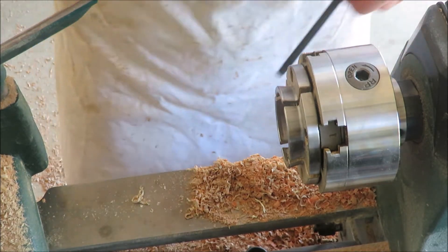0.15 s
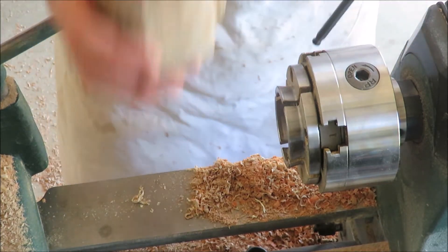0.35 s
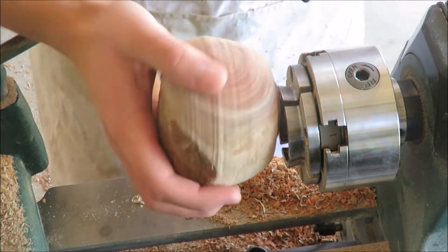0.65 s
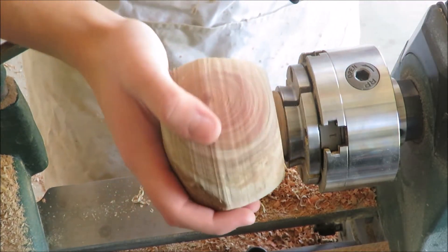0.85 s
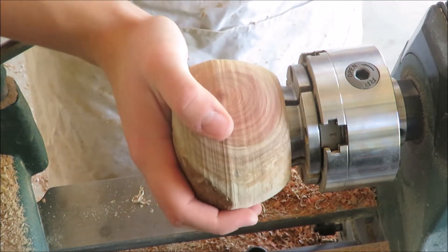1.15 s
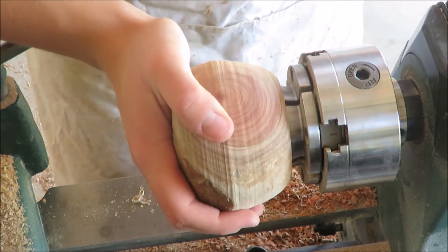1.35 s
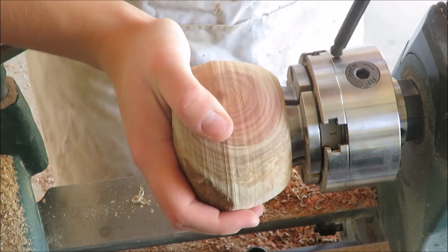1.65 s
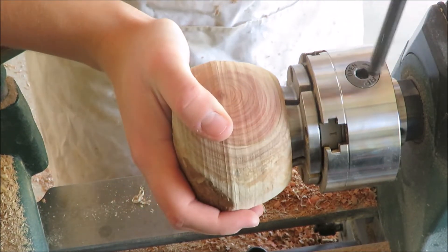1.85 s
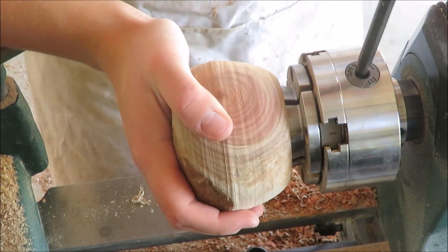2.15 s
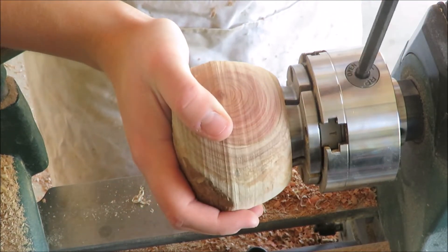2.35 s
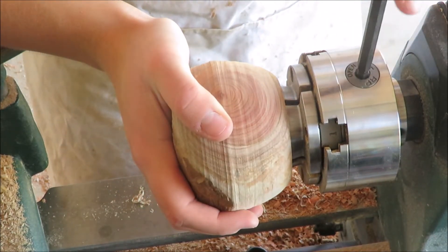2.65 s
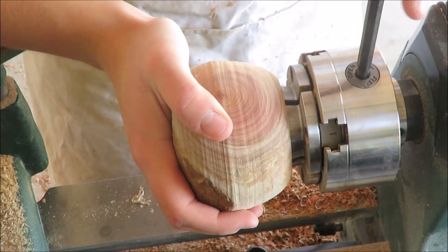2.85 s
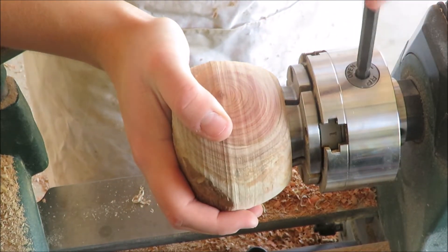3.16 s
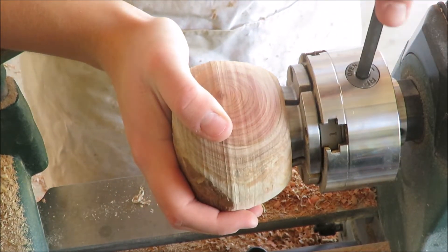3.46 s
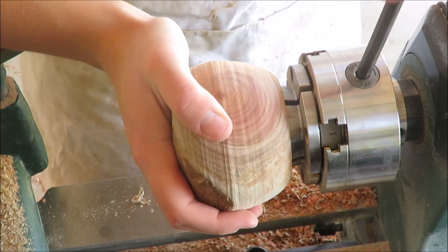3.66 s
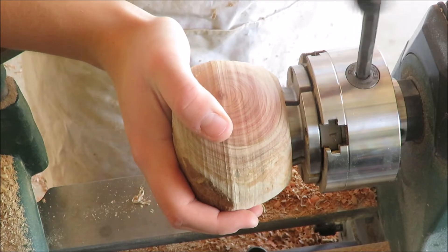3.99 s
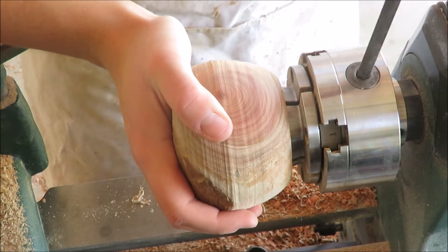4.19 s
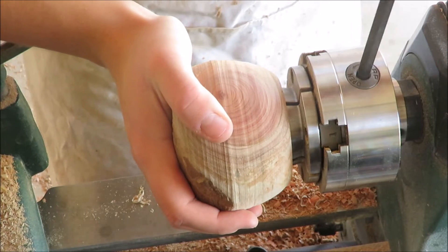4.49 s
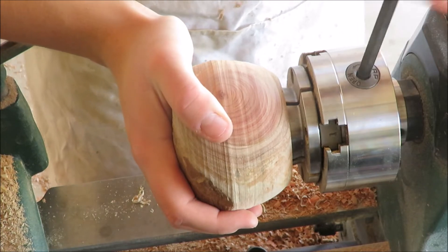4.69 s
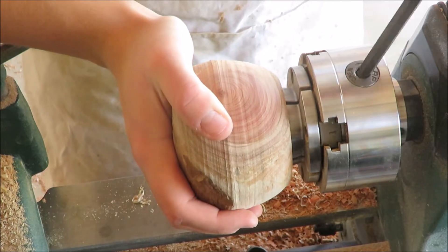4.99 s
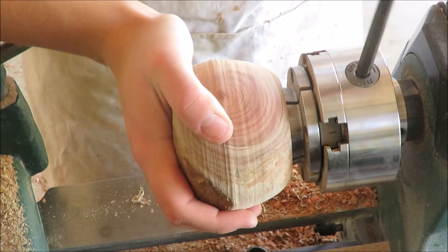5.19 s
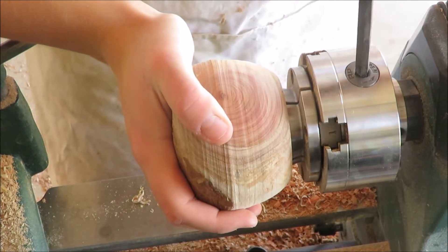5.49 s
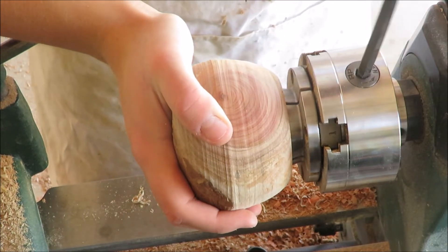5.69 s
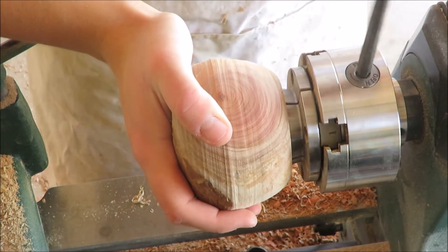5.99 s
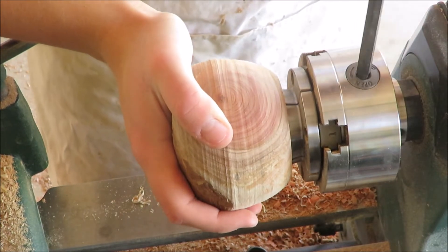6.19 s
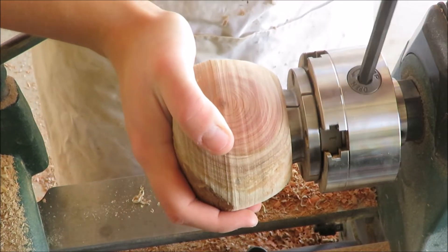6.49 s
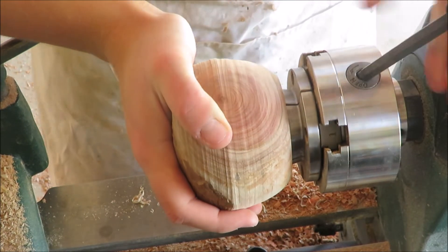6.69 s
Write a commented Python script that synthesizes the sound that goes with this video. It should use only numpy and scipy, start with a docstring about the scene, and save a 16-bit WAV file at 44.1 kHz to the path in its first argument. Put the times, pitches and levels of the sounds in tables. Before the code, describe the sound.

Close stereo microphone in a moderately live workshop. Cloth swishes, then a wooden blank thumps and rattles against loose metal jaws. A steel key knocks loudly on the chuck, taps around for its socket and drops in with a very sharp clack. Faint gritty rasps and small ticks follow as it is wound, while outside a motor vehicle slowly approaches, revving and changing gear.

```python
"""Closing a lathe chuck

A wooden blank bumps into the jaws of a lathe chuck: filtered noise bursts plus wood modes, and the jaws buzz.
A steel key knocks on the chuck, finds its socket and drops home: noise chatter, decaying modes, room echo.
Winding the jaws shut makes a faint rasp of random grains and hiss, with gritty scrapes.
Apart from these, narrow-band noise gives a dull rub, faint whines, a low swell and a squeak.
Cloth noise swishes; outside, a motor vehicle draws nearer: exhaust harmonics and road noise over room air and hum."""
import sys
import numpy as np
from scipy import signal
from scipy.fft import rfft, irfft
from scipy.io import wavfile
from scipy.ndimage import uniform_filter1d

SR = 44100
rng = np.random.default_rng(int(sys.argv[2]) if len(sys.argv) > 2 else 0)


def persist_wave(psi):
    """Save psi, clipped to +-1, as 16-bit WAV."""
    counts = np.round(np.clip(psi, -1, 1) * 32767).astype(np.int16)
    wavfile.write(sys.argv[1], SR, np.atleast_2d(counts).T)


N = 301644  # samples


def amp(db):
    """Decibels to gain."""
    return 10 ** (np.asarray(db) / 20)


def unit(x):
    """Scale to rms 1."""
    return x / np.sqrt(np.mean(x ** 2) + 1e-20)


def read(points, hz):
    """Interpolate a spectrum table on a log-frequency axis."""
    f, value = np.transpose(points)
    return np.interp(np.log(hz + 1), np.log(f + 1), value)


def follow(rows, t):
    """Interpolate the columns of a time table at times t."""
    s, *columns = np.transpose(rows)
    return [np.interp(t, s, c) for c in columns]


def add(mix, start_s, sound):
    """Mix a sound in at start_s, cut at the end of the mix."""
    part = mix[:, round(start_s * SR):][:, :sound.shape[-1]]
    part += sound[..., :part.shape[1]]


def colour(x, points_db, size=4096):
    """Minimum-phase filter with the given spectrum: attacks stay sharp."""
    hz = abs(np.fft.fftfreq(size, 1 / SR))
    log_gain = np.log(amp(read(points_db, hz)))
    response = np.exp(np.conj(signal.hilbert(log_gain)))
    taps = np.fft.ifft(response).real[:size // 2]
    return signal.fftconvolve(np.atleast_2d(x), taps[None], axes=1)[:, :x.shape[-1]]


def slow_random(shape, window):
    """Smooth random curve of rms 1: white noise averaged twice over window samples."""
    once = uniform_filter1d(rng.standard_normal(shape), size=window)
    return unit(uniform_filter1d(once, size=window))


# left-right correlation of diffuse sound: f/Hz, correlation
CORRELATION = [(60, 1.0), (200, 0.91), (550, 0.71), (1650, 0.83), (5000, -0.0039), (15000, -0.6)]


def noise(field_db, length, size=512, width=1):
    """Diffuse stereo noise, partly shared by both channels, with level field_db(t/s, f/Hz)."""
    hop = size // 4
    t = np.arange(length // hop + 5)[:, None] * hop / SR
    hz = np.fft.rfftfreq(size, 1 / SR)
    a, b, c, d = rng.standard_normal((4, len(t), len(hz)))
    same = np.clip(1 - width * (1 - read(CORRELATION, hz)), -1, 1)
    left = a + 1j * b
    right = same * left + np.sqrt(1 - same ** 2) * (c + 1j * d)
    z = np.array([left, right]) * amp(field_db(t, hz))
    return signal.istft(z.swapaxes(1, 2), nperseg=size, noverlap=size - hop)[1][:, :length]


def ring(modes, t):
    """Modal ring: exponentially decaying sines of alternating sign."""
    out = np.zeros(len(t))
    for k, (hz, db, t60_s) in enumerate(modes):
        out += (-1) ** k * amp(db - 60 * t / t60_s) * np.sin(2 * np.pi * hz * t)
    return out


# workshop reverberation: f/Hz, T60/s
ROOM_T60_S = [(150, 0.78), (500, 0.44), (1400, 0.37), (3000, 0.42), (6000, 0.31), (14000, 0.26)]


def echo(spectrum_db, t, build_s, width):
    """Room answer to a blow: noise that builds up briefly, then decays at each band's T60."""
    tail = noise(lambda s, hz: read(spectrum_db, hz) - 60 * s / read(ROOM_T60_S, hz), len(t), width=width)
    early_rms = np.sqrt(np.mean(tail[:, :SR // 20] ** 2))
    return tail / early_rms * (1 - np.exp(-(t / build_s) ** 2))


def near(x, lag_samples=0.87):
    """Close source: the left channel lags by a fraction of a sample."""
    turn = np.exp(-2j * np.pi * np.fft.rfftfreq(len(x)) * lag_samples)
    return np.array([irfft(rfft(x) * turn, len(x)), x])


def arches(rows, peak_at, steepness):
    """Summed gain of one swell per row (start/s, length/s, level/dB), peaking at a share of its length."""
    t = np.arange(N) / SR
    skew = np.log(.5) / np.log(np.clip(peak_at, .05, .95))
    gain = np.zeros(N)
    for start, length, db in rows:
        phase = np.clip((t - start) / length, 0, 1) ** skew
        gain += amp(db) * abs(np.sin(np.pi * phase)) ** steepness
    return gain


# room air spectrum: f/Hz, relative level/dB per Hz
AIR = [(15, -44), (25, -26), (48, -8), (206, -10), (317, -11), (677, -16.5), (911, -16.5), (1070, -17.5),
       (1230, -20.5), (1890, -19), (2220, -21), (12900, -41.5), (16000, -54)]


def workshop(air_db=-49, hum_hz=101.2, hum_db=-61):
    """Steady room background: coloured noise plus a faint mains hum."""
    hum = unit(np.sin(2 * np.pi * hum_hz * np.arange(N) / SR))
    air = unit(noise(lambda s, hz: read(AIR, hz), N, size=2048))
    return amp(air_db) * air + amp(hum_db) * hum


# road noise spectrum: f/Hz, relative level/dB per Hz
ROAD = [(15, -52.5), (25, -21.5), (59, -11.5), (112, -16), (133, -10), (159, -15), (213, -9), (301, -12),
        (446, -18.5), (1080, -13.5), (1490, -14.5), (2300, -22.5), (3200, -26.5), (4800, -37),
        (9000, -49.5), (11700, -84), (19800, -120)]
# engine revs up, changes gear, pulls again: t/s, firing rate/Hz, load/dB
ENGINE = [(1.7, 55.2, -6), (2.15, 57.26, 9.5), (3.3, 71.1, -2), (3.75, 73.9, -14), (4.8, 50.62, -3),
          (5.45, 52.1, -0.5), (5.7, 53.83, 5.5), (6.3, 56.57, 3), (6.55, 57, -4.5), (6.84, 57.85, -0.5)]
# exhaust harmonics: multiple of firing rate, relative level/dB
EXHAUST = [(1, -11), (2, 0), (3, -24), (4, -10.5), (5, -13.5), (6, -19.5), (7, -21.5)]
# straight road
SPEED_M_PER_S, ROAD_OFFSET_M, PASSES_AT_S = 8.08, 7, 7.517
# levels before distance loss; roar follows load at a fraction of dB per dB
ROAR_DB, EXHAUST_DB, GROUND_LOSS_DB_PER_M, ROAR_PER_LOAD = -13.5, -14, 0.29, 0.054
# roar slope above the pivot, far off and abreast
FAR_TILT_DB_PER_OCT, NEAR_TILT_DB_PER_OCT = -5, 4
# the exhaust booms when a harmonic meets the pipe resonance
PIPE_HZ, PIPE_WIDTH_HZ, PIPE_DB = 69, 8.4, 12.5


def vehicle(waver=0.005, throb=0.21, pivot_hz=1000):
    """Exhaust tones and tyre roar swell with falling distance; the roar also brightens."""
    def distance_m(s):
        return np.hypot(ROAD_OFFSET_M, SPEED_M_PER_S * (PASSES_AT_S - s))

    def tilt_db_per_oct(s):
        nearness = ROAD_OFFSET_M / distance_m(s)
        return FAR_TILT_DB_PER_OCT + (NEAR_TILT_DB_PER_OCT - FAR_TILT_DB_PER_OCT) * nearness

    def roar_db(s, hz):
        return read(ROAD, hz) + tilt_db_per_oct(s) * np.log2(np.maximum(hz / pivot_hz, 1))

    t = np.arange(N) / SR
    roar = unit(noise(roar_db, N, size=2048))
    firing_hz, load_db = follow(ENGINE, t)
    drift = slow_random((len(EXHAUST) + 1, N), 2500)
    cycles = np.cumsum(firing_hz * (1 + waver * drift[-1])) / SR
    tones = np.zeros(N)
    for (k, line_db), wobble in zip(EXHAUST, drift):
        boom_db = PIPE_DB * np.exp(-((k * firing_hz - PIPE_HZ) / PIPE_WIDTH_HZ) ** 2)
        tone = np.sin(2 * np.pi * (k * cycles + rng.random()))
        tones += amp(line_db + boom_db) * (1 + throb * wobble) * tone
    sound = amp(ROAR_DB + ROAR_PER_LOAD * load_db) * roar + amp(EXHAUST_DB + load_db) * unit(tones)
    return sound * amp(-GROUND_LOSS_DB_PER_M * distance_m(t)) / distance_m(t)


# cloth spectrum: f/Hz, relative level/dB
CLOTH = [(200, -20), (700, -9), (1200, 0), (1900, 1.5), (3000, -3), (5000, -11.5), (9000, -21.5),
         (16000, -32)]
# arm sweeps past the apron: start/s, length/s, level/dB
SWISHES = [(-0.07, 0.28, -49), (0.07, 0.22, -46), (0.24, 0.32, -41.5), (0.385, 0.34, -35.5)]


def sleeve(flutter_db=1.0):
    """Cloth brushes the apron as the arm brings the blank in: noise of fluttering level."""
    swish = noise(lambda s, hz: read(CLOTH, hz) + flutter_db * rng.standard_normal(s.shape), N)
    return arches(SWISHES, peak_at=0.23, steepness=3.06) * unit(swish)


# dull rub, faint whines, low swell, squeak: start/s, end/s, f/Hz, width/Hz, level/dB
NARROW_BANDS = [(0.015, 0.183, 680, 290, -46.5), (2.203, 3.6, 1073, 57, -55), (2.898, 4.2, 1620, 99, -56.5),
                (5.036, 5.397, 38.3, 16, -43), (6.023, 6.085, 7900, 200, -54)]


def narrow_band_tones():
    """Narrow-band noise: wavering tones that swell and fade."""
    t, bins_hz, out = np.arange(N) / SR, np.fft.rfftfreq(N, 1 / SR), np.zeros(N)
    for start, end, hz, width_hz, db in NARROW_BANDS:
        band = np.exp(-((bins_hz - hz) / width_hz) ** 2)
        tone = unit(irfft(rfft(rng.standard_normal(N)) * band, N))
        swell = np.sin(np.pi * np.clip((t - start) / (end - start), 0, 1))
        out += amp(db) * tone * swell
    return near(out)


# rasp spectrum: f/Hz, relative level/dB
RASP = [(1000, -13.5), (3000, -3), (6000, -2), (9000, -5), (13000, 1), (14800, -3.5), (16000, -17.5)]
# hand shifts its grip or pushes the key round: start/s, length/s, level/dB
STROKES = [(-0.03, 0.3, -53.5), (2.54, 0.17, -64), (2.75, .15, -68), (3.08, 0.41, -62), (3.35, 0.41, -62),
           (3.74, 0.33, -62.5), (4.17, 0.57, -61), (4.66, 0.23, -51.5), (4.89, 0.24, -52.5),
           (5.16, 0.18, -56.5), (5.35, 0.48, -56.5), (5.75, 0.24, -61), (5.95, 0.44, -56.5),
           (6.29, 0.18, -55.5), (6.54, 0.33, -55.5)]
GRIP_FROM_S, GRIP_DB = 3.75, -67  # key seated: the hand keeps rubbing on it


def rasp(grains_per_s=1500, spread_db=2.0, rasp_db=0.5, hiss_share=1.0, uneven_db=2.8):
    """Tiny slips of dusty steel and skin as the key is handled and turned: random grains plus hiss."""
    gripping = np.arange(N) / SR > GRIP_FROM_S
    level = arches(STROKES, peak_at=0.26, steepness=1.5) + amp(GRIP_DB) * gripping
    pressure = slow_random(N, 700)
    happens = rng.random(N) < grains_per_s / SR
    sign = rng.choice([-1, 1], N)
    size = amp(spread_db * np.minimum(rng.exponential(1, N), 5))
    grains = unit(colour(near(happens * sign * size), RASP))
    hiss = unit(noise(lambda s, hz: read(RASP, hz), N))
    return amp(rasp_db + uneven_db * pressure) * level * unit(grains + hiss_share * hiss)


# key drags on the socket wall: start/s, end/s, level/dB
SCRAPES = [(3.344, 3.419, -47.5), (3.416, 3.516, -41.5), (4.682, 4.761, -46), (6.577, 6.628, -38)]
# drag spectrum: f/Hz, relative level/dB
DRAG = [(300, -14), (1200, 8.5), (2600, 2), (5800, -7), (8000, -15), (14000, -14), (16000, -33.5)]


def scrapes(grit_db=0.5):
    """Short gritty slides of the key in its socket: roughened noise under a tapered window."""
    out = np.zeros((2, N))
    for start, end, db in SCRAPES:
        count = max(round((end - start) * SR), 64)
        grit = rng.standard_normal(SR // 4) * amp(grit_db * rng.standard_normal(SR // 4))
        slide = unit(near(colour(grit, DRAG)[0][:count]))
        add(out, start, amp(db) * slide * signal.windows.tukey(count, .7))
    return out


# low wooden knocks: blank on the jaws, later key jolts through the chuck; only early ones rattle:
# t/s, level/dB, low/dB, edge/dB
KNOCKS = [(0.695, -10, 0, -4), (0.8357, -16, -13, -17), (0.8459, -20, -3.5, -15), (0.9949, -21.5, -7, -6),
          (1.0212, -19.5, 1.5, 2), (1.0383, -18, -7, -22), (1.1222, -23, -3.5, -13),
          (3.4841, -21, -12.5, -13), (4.048, -26, -29, -2.5), (4.7108, -34, -4, 5),
          (4.9252, -33.5, -15, 7.5), (5.2151, -35, -11, 7.5), (6.6913, -31.5, 1, 12.5)]
# loose jaw spectrum: f/Hz, relative level/dB
JAW = [(3000, -30), (5000, -13), (5850, -3), (6900, -18), (11500, -36), (13000, -10), (14200, -34)]
# the jaws rattle after each knock until the key takes up their slack
RATTLE_DB, RATTLE_PER_EDGE, RATTLE_LAG_S, SLACK_UNTIL_S = -26, 0.73, 0.0093, 2


def jaw_rattles(buzz_s=0.0085, room_db=-14):
    """Loose jaws buzz in their slots when the blank jolts them: decaying noise plus room."""
    out, t = np.zeros((2, N)), np.arange(SR // 2) / SR
    for s, db, _, edge_db in KNOCKS:
        if s < SLACK_UNTIL_S:
            buzz = unit(colour(rng.standard_normal(len(t)), JAW)[0]) * np.exp(-t / buzz_s)
            sound = near(buzz) + amp(room_db) * echo(JAW, t, build_s=.004, width=1.0)
            add(out, s + RATTLE_LAG_S, amp(db + RATTLE_DB + RATTLE_PER_EDGE * edge_db) * sound)
    return out


# modes of blank and lathe bed: f/Hz, level/dB, T60/s
BLANK = [(131.2, -17, 0.3), (204, -5, 0.21), (210.6, -21, 2.32), (246, 7, 0.036), (282.5, -19, 0.43),
         (336.8, 0, 0.15), (412, -8.5, 0.11), (489.6, -10.5, 0.19), (508, -42.5, 0.14), (918, -15, 0.24),
         (1200, -19.5, 0.18), (1515, -6.5, 0.047)]
# contact thud spectrum: f/Hz, relative level/dB
THUD = [(40, -41), (110, -16), (230, -4), (420, -3), (630, -12.5), (950, -8), (1500, -14), (2600, -22),
        (4500, -37), (6000, -38), (9000, -48), (16000, -58)]
CONTACT_S = 0.0072  # decay of the contact thud


def low_knocks(thud_db=-4, ring_db=-2, room_db=-15.5):
    """Blank bumps and key jolts: a soft push into the modes of blank and lathe bed."""
    out, t = np.zeros((2, N)), np.arange(SR) / SR
    for s, db, low_db, edge_db in KNOCKS:
        thud = unit(colour(rng.standard_normal(len(t)), THUD)[0]) * np.exp(-t / CONTACT_S)
        body = ring(BLANK, t) * (1 - np.exp(-2 * t / CONTACT_S))
        direct = near(amp(thud_db) * thud + amp(ring_db) * body)
        sound = direct + amp(room_db) * echo(THUD, t, build_s=0.0029, width=0.28)
        add(out, s, amp(db) * colour(sound, [(220, low_db), (330, 0.0033), (400, 0), (1000, edge_db)]))
    return out


RIM, SOCKET = "rim", "socket"  # where the key lands


def struck_at(modes, place):
    """The point of contact sets how strongly each mode is driven."""
    return [(hz, rim_db if place == RIM else socket_db, t60_s) for hz, rim_db, socket_db, t60_s in modes]


# key on chuck: t/s, place, level/dB, top/dB, chuck ring/dB, chatter time/s
CLICKS = [(0.159, SOCKET, -37, 3, -5, 0.0013), (1.666, RIM, 2.5, -6.5, -3.5, 0.0025),
          (1.712, RIM, -18.5, -11, -11, 0.00089), (2.0045, RIM, -6, 5.5, -2, 0.0015),
          (2.0396, RIM, -30, -19, -2, .0011), (2.13, RIM, -32, -12, -0.5, .0013),
          (2.1606, RIM, -26.5, -8.5, -3.5, .0011), (2.2339, RIM, -13.5, -2.5, -19, 0.0025),
          (2.3187, RIM, -19.5, -7.5, -21, 0.002), (2.3903, RIM, -36.5, -17, -1.5, .0015),
          (3.484, SOCKET, 6, 4.5, -6, 0.0014), (4.046, SOCKET, -20, -0.5, -17, 0.0031),
          (4.6909, SOCKET, -37, 6, -6, 0.01), (4.9239, SOCKET, -29.5, -4, -21, 0.012),
          (4.957, SOCKET, -37, 7, -7, 0.01), (5.2165, RIM, -47, -13, 5, 0.0018),
          (6.6916, SOCKET, -23, -10, -2, 0.0025), (6.7021, SOCKET, -20, -8.5, -8, 0.0021),
          (6.8189, RIM, -21.5, -7, -10, 0.006)]
# hand-damped key modes: f/Hz, rim level/dB, socket level/dB, T60/s
KEY = [(920, -5.5, -14.5, 0.035), (1140, -11.5, -20.5, 0.0083), (2168, -5.5, -8.5, 0.012),
       (2520, -8, -7.5, 0.023), (2984, -7, -10, 0.018), (3740, -12.5, -10.5, 0.025), (4650, -3, -14, 0.02),
       (5400, -18.5, -14.5, 0.016), (6310, -13, -9, 0.013), (6850, -4.5, -12.5, 0.0061),
       (7570, -9.5, -10, 0.017), (9550, -22, -30.5, 0.02), (8995, -9.5, -12.5, 0.009),
       (9820, -12, -12, 0.015), (10290, -22, -10, 0.018), (12240, -29, -16, .02),
       (13750, -40, -18.5, 0.032)]
# modes of the chuck on its spindle: f/Hz, rim level/dB, socket level/dB, T60/s
CHUCK = [(324, -32, -32.5, .3), (380, -32, -35, 0.15), (433.6, -32, -45, .3), (835, -33.5, -34, 0.3),
         (856, -27.5, -35.5, 0.51), (1074, -30.5, -45, 0.22), (1253, -46, -30, 0.16),
         (1204, -37, -30.5, 0.25), (1374, -29, -24, .36), (1418, -30.5, -31, .33), (1580, -41, -30.5, .3),
         (1722, -33.5, -43.5, 0.45), (2230, -40, -47.5, 0.14), (2290, -38, -51.5, 0.26),
         (2220, -43, -45, .3), (2420, -39, -48, 0.38), (2720, -33, -34.5, 0.32), (2910, -43, -36, 0.21),
         (2790, -45, -41, 0.46), (3060, -50, -47, 0.32), (4010, -44, -45, .35), (4700, -37, -42, 0.25),
         (4850, -45, -50, .45), (4930, -55, -41, .28), (7740, -54, -52, .28), (10180, -69, -59, 0.31),
         (13000, -74, -61.5, 0.18)]
# chatter spectrum: f/Hz, relative level/dB
CRACK = [(100, -22.5), (600, -9), (1000, 9), (2700, 2), (4800, -1.5), (5700, -4), (7300, -0.5),
         (10000, -14.5), (12000, -15.5), (16000, -7)]
# room echo of steel blows: f/Hz, relative level/dB
STEEL_ECHO = [(60, -24), (330, -3), (620, -4.5), (870, -1.5), (1400, 6.5), (1850, -4), (2700, -4),
              (3400, -10.5), (4700, -10.5), (5300, -14.5), (10000, -26), (16000, -32)]
# soft blows, and blows that go into the chuck, have more body (slopes in dB per dB)
BODY_DB, BODY_PER_SOFTNESS, BODY_PER_RING = -2, .28, .8
BRIEF_CHATTER_S, ROOM_DB_PER_DOUBLING = .003, 4  # longer chatter feeds the room more


def key_clicks(crack_db=-4.5, key_db=-5.0, room_db=-26, clang_db=-24.5, clang_s=0.013,
               body_hz=1300, top_hz=6500):
    """Steel chatters on steel for a few ms; key, chuck and room ring on."""
    out, t = np.zeros((2, N)), np.arange(SR // 2) / SR
    fade = np.minimum(4 * (1 - t / t[-1]), 1)
    for s, place, db, top_db, ring_db, chatter_s in CLICKS:
        body_db = BODY_DB - BODY_PER_SOFTNESS * db + BODY_PER_RING * ring_db
        wet_db = ROOM_DB_PER_DOUBLING * np.log2(chatter_s / BRIEF_CHATTER_S)
        crack = unit(colour(rng.standard_normal(len(t)), CRACK)[0]) * np.exp(-t / chatter_s)
        key = ring(struck_at(KEY, place), t)
        chuck = ring(struck_at(CHUCK, place), t)
        steel = amp(crack_db) * crack + amp(key_db) * key + amp(ring_db) * chuck
        room = echo(STEEL_ECHO, t, build_s=0.0017, width=0.46)
        # the walls return the chuck's own notes as a beating clang
        clang = signal.fftconvolve(room, (chuck * np.exp(-t / clang_s))[None], axes=1)[:, :len(t)]
        clang = unit(clang) * room.std()
        sound = fade * (near(steel) + amp(room_db + wet_db) * room + amp(clang_db + ring_db) * clang)
        # a blunt blow has more body, a sharp one more top
        tone_db = [(body_hz, body_db), (2200, 0), (4800, 0), (top_hz, top_db)]
        add(out, s, amp(db) * colour(sound, tone_db))
    return out


def scene(right_db=0.11):
    """Sum of all sources, balanced slightly to the right."""
    blows = key_clicks() + low_knocks() + jaw_rattles()
    rubs = rasp() + scrapes() + narrow_band_tones() + sleeve()
    background = vehicle() + workshop()
    return (blows + rubs + background) * amp([[-right_db], [right_db]])


def record(dry, edge_hz=16100):
    """Input overload clips at full scale; a linear-phase low-pass then limits the band."""
    clipped = np.clip(dry, -1, 1)
    low_pass = signal.firwin(1023, edge_hz, window=("kaiser", 8), fs=SR)
    return signal.oaconvolve(clipped, low_pass[None], "same")


dry = scene()
out = record(dry)
persist_wave(out)
```